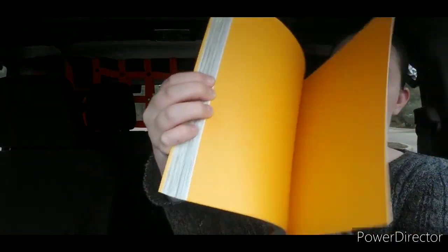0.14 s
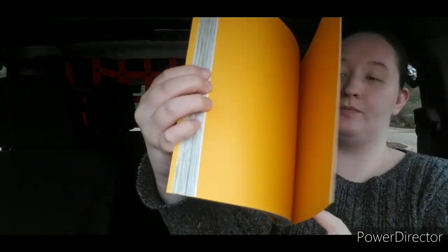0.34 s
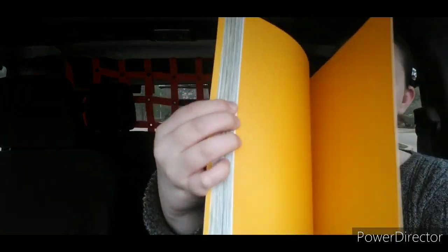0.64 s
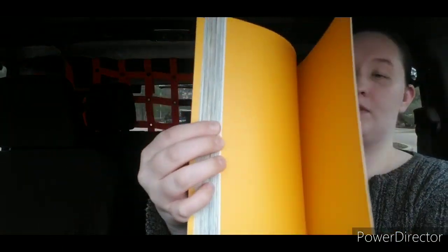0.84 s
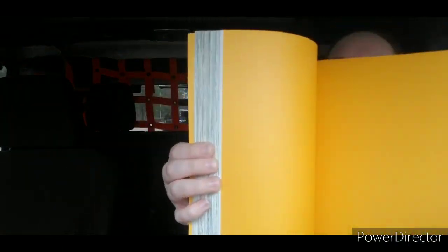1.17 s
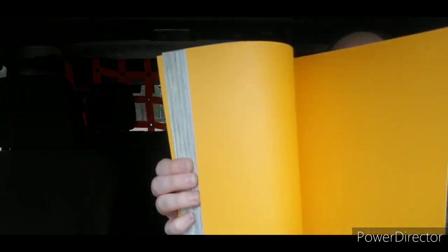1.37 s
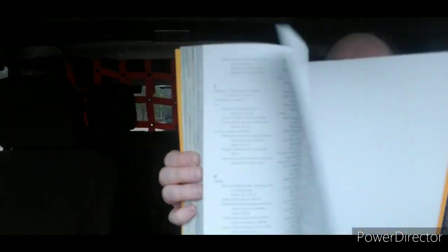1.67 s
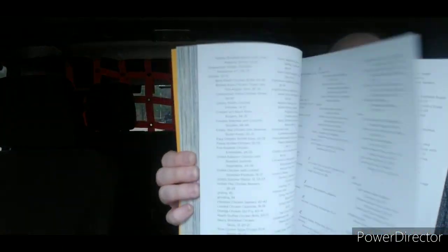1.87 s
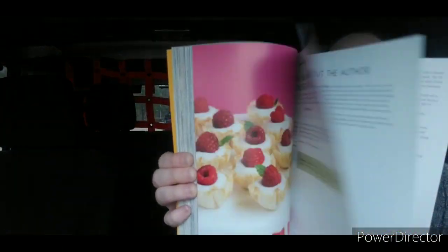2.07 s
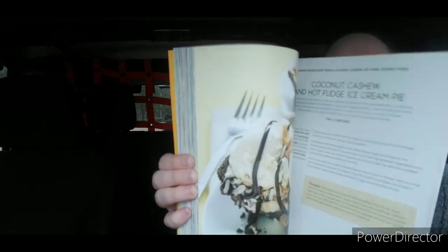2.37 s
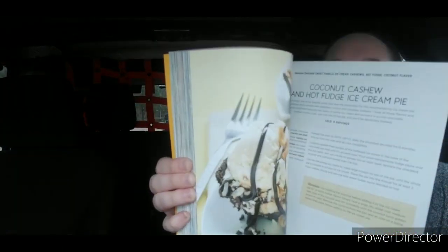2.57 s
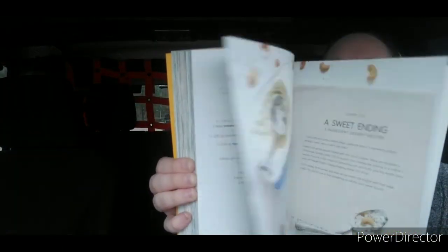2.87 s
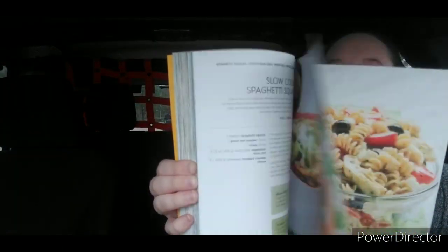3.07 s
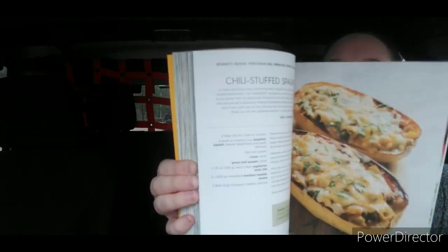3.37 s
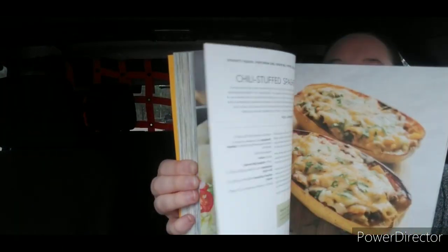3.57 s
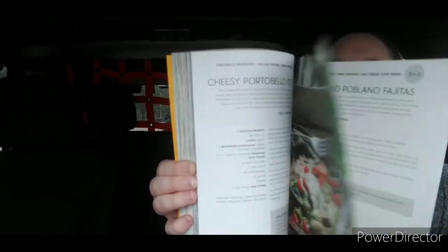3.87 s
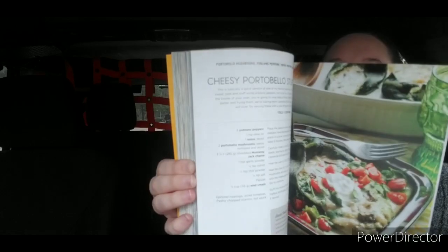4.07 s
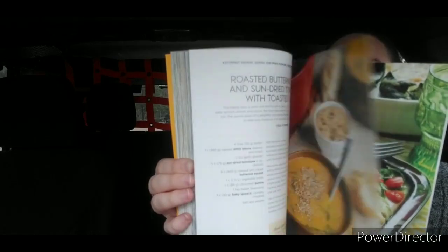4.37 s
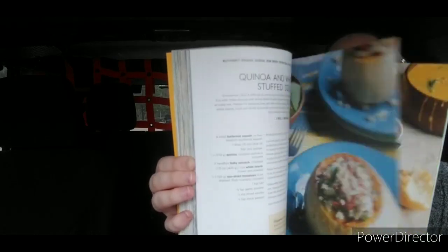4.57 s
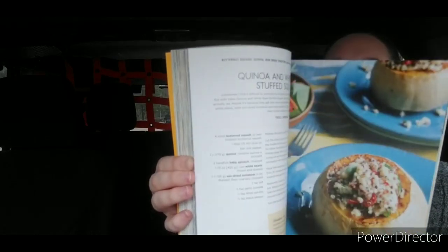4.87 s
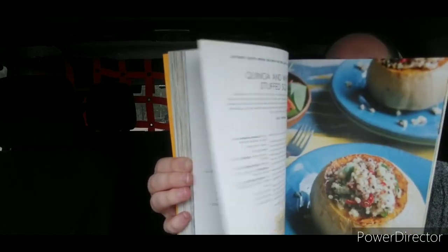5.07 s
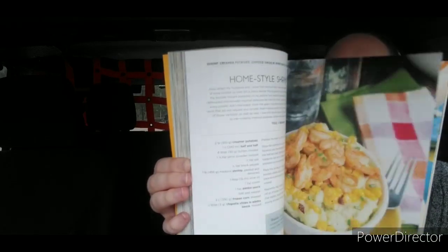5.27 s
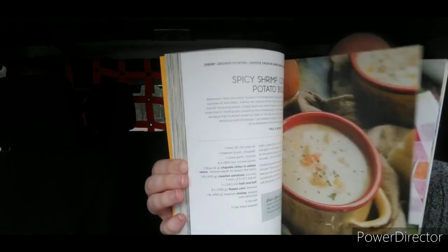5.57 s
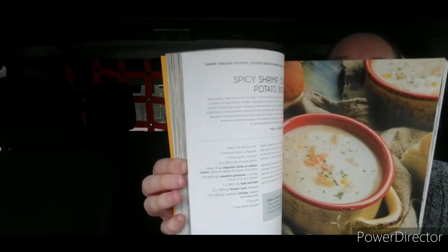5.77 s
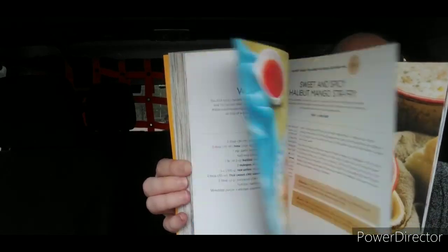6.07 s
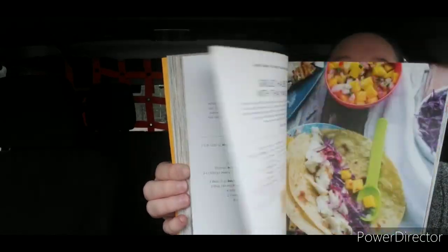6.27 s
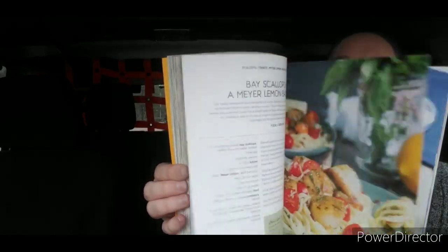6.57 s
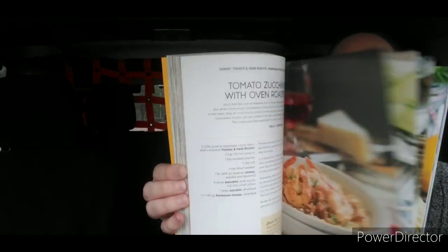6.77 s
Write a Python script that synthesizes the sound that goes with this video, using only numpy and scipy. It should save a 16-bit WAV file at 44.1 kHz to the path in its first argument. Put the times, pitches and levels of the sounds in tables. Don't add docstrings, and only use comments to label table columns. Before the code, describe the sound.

Glossy paperback pages snap and swish past a thumb one by one, after a creaking spine, over a low idling engine hum.

```python
import sys
import numpy as np
from scipy import signal
from scipy.fft import rfft, irfft
from scipy.io import wavfile
from scipy.ndimage import uniform_filter1d, map_coordinates

SR = 44100
rng = np.random.default_rng(int(sys.argv[2]) if len(sys.argv) > 2 else 0)


def boost(x):
    u = np.asarray(x, float) / 20
    return 10 ** u


def transcribe(signal):
    frames = np.atleast_2d(signal).T
    limited = np.clip(frames, -1, 1)
    pcm = np.round(limited * 32767).astype(np.int16)
    wavfile.write(sys.argv[1], SR, pcm)


N = 305613


def rms_one(x):
    return x / np.sqrt(np.mean(x ** 2) + 1e-20)


def in_time(rows, outside=None):
    s, *columns = np.transpose(rows)
    return [np.interp(np.arange(N) / SR, s, column, outside, outside) for column in columns]


def at_hz(points, hz):
    point_hz, value = np.transpose(points)
    return np.interp(np.log(hz + 1), np.log(point_hz), value)


def drift(rate_hz):
    knots = rng.standard_normal(400)
    return map_coordinates(knots, [np.arange(N) / SR * rate_hz], order=3, mode="wrap")


def panned(db):
    return boost(np.array([db / 2, -db / 2]))


def resonance(x, hz, width_hz):
    r = np.exp(-np.pi * width_hz / SR)
    top = np.array([1, 0, -1]) * (1 - r * r) / 2
    bottom = [1, -2 * r * np.cos(2 * np.pi * hz / SR), r * r]
    return signal.lfilter(top, bottom, x + 1e-18)


def coloured(x, modes):
    click = signal.unit_impulse(2048)
    ring = 0
    for k, (hz, width_hz, db) in enumerate(modes):
        once = resonance(click, hz, 0.89 * width_hz)
        ring = ring + (-1) ** k * boost(db) * resonance(once, hz, width_hz)
    return signal.oaconvolve(x, ring[None] / np.linalg.norm(ring))[:, :N]


def crackle(per_s, spread_db, smooth):
    sizes = boost(spread_db * np.minimum(rng.exponential(1, N), 4)) * rng.choice([-1, 1], N)
    slips = sizes * (rng.random(N) < per_s / SR)
    return rms_one(rms_one(slips) + smooth * rng.standard_normal(N))


# pitch_hz, likeness (1 same, 0 or below unlike)
LIKENESS = [(60, 0.97), (180, 0.89), (550, 0.38), (1650, -0.7), (4970, -0.13), (15000, -0.017)]
# pitch_hz, left_minus_right_db
NOISE_LEAN = [(60, 5), (380, 3.5), (2380, 3.5), (15000, -1.5)]


def stereo_noise(spectrum):
    hz = np.arange(N // 2 + 1) * SR / N
    mid, side = rfft(rng.standard_normal((2, N)))
    alike = np.clip(at_hz(LIKENESS, hz), 0, 1)
    pair = np.sqrt(1 + alike) * mid + np.sqrt(1 - alike) * side * [[1], [-1]]
    out = irfft(pair * boost(at_hz(spectrum, hz)) * panned(at_hz(NOISE_LEAN, hz)), N)
    return out / np.std(out.mean(axis=0))


# pitch_hz, level_db (per Hz)
HISS = [(760, -46), (1300, -3.5), (1900, -2), (3100, -4.5), (4300, -6), (5700, -10), (6800, -5),
        (8000, -6.5), (8600, -10.5), (9500, -0.5), (11200, -3.5), (12800, 2), (15600, -4), (17000, -2.5)]


def microphone_hiss():
    return boost(-67 + 0.22 * drift(3.2)) * stereo_noise(HISS)


# pitch_hz, level_db (per Hz)
RUMBLE = [(12, -15.5), (22, -2.5), (45, -0.5), (80, -2.5), (130, -5.5), (165, -9.5), (250, -11.5),
          (420, -13), (620, -18), (820, -24), (1100, -31.5), (1400, -46), (2200, -52), (4000, -64)]


def cabin_rumble():
    return boost(-47.5) * stereo_noise(RUMBLE)


# pitch_hz, width_hz, level_db
HUMS = [(120.6, 9.6, -59), (199.5, 9.2, -58.5), (285.3, 26, -62.5), (395, 34, -63.5), (606, 10.6, -69.5),
        (1013, 34, -82.5)]


def hums():
    out = 0
    for hz, width_hz, db in HUMS:
        shaking = rng.standard_normal((1, N)) + 0.18 * rng.standard_normal((2, N))
        ringing = resonance(resonance(shaking, hz, width_hz), hz, width_hz)
        out = out + boost(db) * rms_one(ringing)
    return out * panned(1.7)[:, None]


def tone(hz, db, lag):
    turns = np.cumsum(hz) / SR
    return np.sqrt(2) * boost(db) * np.sin(2 * np.pi * turns + np.array([[-lag], [0]]) + 0.54)


# time_s, pitch_hz, level_db
FAR_LOW = [(1.5, 103.6, -59), (2.902, 107.9, -54.5), (3.58, 109.6, -44.5), (3.85, 110.6, -53),
           (4.15, 111.6, -43.5), (4.45, 114.6, -70), (4.8, 115.5, -54.5), (5.299, 118.9, -51),
           (5.949, 121.2, -58)]
# time_s, pitch_hz, level_db
FAR_HIGH = [(3.798, 228.1, -97), (4.0, 227, -62.5), (4.35, 227.7, -53.5), (4.65, 228, -61),
            (4.95, 228.4, -60), (5.2, 229.3, -62.5), (5.45, 229.4, -51), (5.9, 229.8, -63.5),
            (6.9, 230.4, -61.5)]


def far_vehicle():
    out = 0
    for rows in FAR_LOW, FAR_HIGH:
        hz, db = in_time(rows, outside=-150)
        out = out + tone(hz + 1.0 * drift(5.5), db + 2.5 * drift(7.0), lag=0.45)
    return out * panned(6.2)[:, None]


# time_s, pitch_hz, level_db
IDLE = [
    (0.1, 34.3, -42.5),
    (2.5, 33.65, -42),
    (5, 34.3, -41.5),
    (6.85, 34.1, -41),
]
# thirds, level_db (re firing)
THIRDS = [(2, -14.5), (5, -16), (6, -27), (7.5, -30)]


def engine():
    hz, db = in_time(IDLE)
    out = tone(hz, db + 1.2 * drift(7.2), lag=0.29)
    for thirds, re_db in THIRDS:
        third_hz = hz * thirds / 3 + 0.5 * drift(2.12)
        out += tone(third_hz, db + re_db + 7.7 * np.tanh(drift(2.03)), lag=0.05)
    return out * panned(5.1)[:, None]


# pitch_hz, width_hz, level_db
SPINE = [
    (1004, 260, 0),
    (1016, 250, -1.2),
    (1696, 166, 0.013),
]
# start_s, peak_db, high_creak_share (0-1)
CREAKS = [(0.212, -37, 0), (0.275, -37, 0.3), (0.307, -32, 0.84), (0.3113, -37, 0.9), (0.317, -35, 1),
          (0.3223, -29, 0.8), (0.327, -29.5, 0.8), (0.331, -33, 0.8), (0.336, -33, 0.45), (0.34, -40, 0.8),
          (0.344, -37, 0.3), (0.349, -37, 0.3), (0.353, -42, 0.2), (0.614, -40, 0.36),
          (0.6453, -34.5, 0.44), (0.65, -33, 0), (0.748, -43, 0), (0.652, -48, 0.6), (0.912, -41, 0.54),
          (1.018, -44, 0.05), (1.027, -56, 0.1), (1.044, -43, 0.05), (1.067, -55, 0.1), (1.096, -56, 0.05),
          (1.103, -45, 0), (1.112, -50, 0.1), (1.164, -33.5, 0.57), (1.186, -47, 0), (1.194, -53, 0.1),
          (1.2, -53, 0.4), (1.216, -42.5, 0.9), (1.44, -37, 0.25), (2.037, -49, 1), (3.027, -43, 0.66),
          (6.0208, -47, 0.2), (6.037, -46, 1), (6.053, -50, 1), (6.439, -40, 0.85), (6.697, -33.5, 0.85)]
# start_s, peak_db, pitch_hz
KNOCKS = [(0.2125, -37.5, 1330), (0.647, -35, 2250), (0.6525, -37, 2000), (0.648, -43, 890),
          (0.654, -46, 860), (1.02, -52, 850), (1.045, -47, 850), (1.217, -49, 1150), (1.165, -39.5, 825),
          (1.189, -39, 834), (1.197, -42, 760), (1.203, -64, 780), (6.0215, -41.5, 1390),
          (6.028, -51, 1055)]


def creaks():
    s, db, upper = np.transpose(CREAKS)
    upper = np.clip(upper, 0, 1)
    out = np.zeros(N)
    for (hz, width_hz, level_db), share in zip(SPINE[1:], [1 - upper, upper]):
        clicks = np.zeros(N)
        clicks[(s * SR).astype(int)] = boost(db + 32.5 + level_db) * share
        out += resonance(resonance(clicks, hz, 850), hz, width_hz)
    for start_s, peak_db, hz in KNOCKS:
        i = int(start_s * SR)
        soft = resonance(signal.unit_impulse(1024), hz, 620)
        out[i:i + 1024] += boost(peak_db + 31.5) * resonance(soft, hz, 410)
    return out * panned(4.1)[:, None]


def strokes(rows):
    t, out = np.arange(N) / SR, np.zeros((2, N))
    for s, length, db, second_db in rows:
        near = slice(max(0, int((s - .3) * SR)), int((s + length + .3) * SR))
        u = t[near] - s
        rise_s, fall_s = 0.014 + 0.44 * length, 0.0065 + 0.06 * length
        shape = 4.5 * (np.sin(np.pi * np.clip(u / length, 0, 1)) - .5)
        shape += 20 * np.minimum(u, 0) / rise_s
        shape -= 20 * np.maximum(u - length, 0) / fall_s
        out[:, near] += boost(db + shape + np.array([[0], [second_db]]))
    return out


# start_s, length_s, treble_db, middle_db (re treble)
GLIDES = [(.03, 0.056, -52.5, -8.5), (.135, 0.089, -35, -10.5), (.262, 0.034, -59, -9),
          (.31, 0.049, -50.5, -2.5), (.365, 0.12, -55, -12.5), (.565, 0.044, -52.5, -10),
          (.59, 0.037, -42.5, -9.5), (.642, 0.013, -39.5, -7), (.66, 0.02, -50, -7),
          (.675, 0.064, -36.5, -14), (.79, 0.018, -54, -8.5), (.85, 0.05, -58.5, -4.5),
          (.91, 0.035, -52.5, -8), (1.01, 0.053, -60.5, -1.5), (1.09, 0.044, -58.5, -6),
          (1.15, 0.08, -60, -6.5), (1.25, 0.78, -68, -5), (2.196, 0.0098, -66, -21),
          (2.216, 0.014, -51.5, -4), (3.0, 0.016, -63, -7), (5.406, 0.006, -53, -14),
          (5.415, 0.018, -38.5, -12), (6.024, 0.011, -50, -13), (6.262, 0.017, -45.5, -4),
          (6.418, 0.0073, -48, -6), (6.432, 0.015, -42, -14), (6.592, 0.022, -57, -11),
          (6.619, 0.011, -45, -18), (6.659, 0.018, -46, -9), (6.694, 0.012, -41, -4),
          (6.835, 0.094, -65, -6)]
# start_s, length_s, sheet_db, spine_db (re sheet)
GRINDS = [(.025, 0.035, -65.5, 8.5), (.06, 0.19, -60.5, -10), (.212, 0.019, -45, -3), (.265, 0.03, -53, -1),
          (.308, 0.042, -41.5, -5.5), (.385, .05, -55.5, -6), (.59, 0.068, -50.5, -1.5),
          (.642, 0.015, -50, 0), (.668, 0.077, -57.5, -6), (.738, 0.02, -51, 2.5), (.765, 0.015, -57, 3),
          (.85, 0.025, -58, -4), (.905, 0.044, -59.5, 6.5), (1.012, 0.025, -59.5, 15),
          (1.05, 0.023, -54, 2), (1.093, 0.026, -66, 19), (1.122, 0.034, -62, 12), (1.185, 0.022, -56.5, 6),
          (1.28, 0.26, -69.5, 5), (5.428, 0.006, -48, -17), (6.035, 0.061, -61.5, -3),
          (6.262, 0.047, -60, -3), (6.67, 0.037, -46, -24), (6.696, 0.008, -56, -19)]


def slides():
    levels = np.vstack([strokes(GLIDES), strokes(GRINDS)])
    # slips_per_s, size_spread_db, smooth_part, unlike_part, lumps_db, lean_db
    kinds = [(8950, 3.0, 1.1, 1.0, 1.4, 6.0), (3500, 3.9, 0.6, 1.0, 1.3, 9.1),
             (895, 1.2, 1.5, 0.68, 2.7, 3.6), (515, 4.7, 0.66, 0.17, 2.5, 4.0)]
    out = []
    for level, (per_s, spread_db, smooth, unlike, lumps_db, lean_db) in zip(levels, kinds):
        shared = crackle(per_s, spread_db, smooth)
        own = crackle(per_s, spread_db, smooth)
        friction = rms_one(shared + unlike * own * [[1], [-1]])
        lumps = boost(lumps_db * drift(50) - 9.0)
        out.append(lumps * level * friction * panned(lean_db)[:, None])
    return out


# start_s, treble_db,
# edge_db (re treble), flap_db (re treble)
PAGES = [(0.6395, -41, -8, -5), (1.4468, -36, -14, -13.5), (1.614, -39.5, -10.5, -15),
         (1.75, -50.5, -4, -2.5), (1.7697, -43, -1.5, 0), (1.9612, -38.5, -9, -12),
         (2.0362, -42, -7.5, -3.5), (2.2128, -36, -6, -23), (2.2285, -46, -2.5, 0), (2.696, -40, -2.5, -10),
         (2.866, -43, -1.5, -10), (3.0225, -38, -4.5, -2.5), (3.1782, -43.5, -5.5, -5),
         (3.7858, -47.5, -4.5, -8), (4.2635, -40, -11.5, 1), (4.4705, -39.5, -1, 1),
         (4.8691, -39, -4.5, -16), (4.9081, -43.5, -8.5, -6), (5.0956, -41.5, -5.5, -2.5),
         (5.4039, -45, 1.5, 0), (5.4147, -44.5, -10, 6), (5.431, -41, -6, 2), (6.021, -47.5, -1, 0),
         (6.0398, -34.5, -8.5, -15), (6.2679, -34, -6.5, -17), (6.4147, -28, -16, -32),
         (6.4292, -43, -1, -1.5), (6.6156, -30.5, -13.5, -17), (6.6712, -36, -8, -5),
         (6.7001, -41, -7.5, 0.5),
         (0.2117, -39.5, -1, -3), (0.6451, -35, -5.5, -20), (0.6543, -39.5, -2, -24),
         (0.699, -48, 2.5, -19), (4.405, -54, -11, -9), (4.415, -50.5, -14, -7), (4.425, -55, -23, -1),
         (4.437, -50, -15, -7), (4.448, -50, -14, -6), (4.4611, -42, -10, 2), (6.598, -64, -3, -11),
         (6.648, -67, -14, 0), (6.664, -33.5, -11, -6.5), (6.677, -54, -13, -6), (6.7055, -54, -14, -20),
         (1.164, -54.5, 0.5, 7), (3.5112, -52.5, -9, -35), (3.547, -55.5, -9, -26), (3.591, -67.5, 0, 3),
         (3.7948, -49, -16, -3.5), (4.0138, -47.5, -13, -7), (4.1319, -49.5, -8, -7),
         (4.269, -50, -12.5, -14), (4.494, -42, -16, -13), (4.636, -61.5, 1.5, -10),
         (4.744, -51.5, -5, -24), (5.088, -46, -6, 4), (5.236, -45, -18, -23), (5.3257, -50.5, -10.5, -27),
         (5.3433, -55, -12, -16), (5.3603, -51.5, -14, -11), (5.7473, -69, 0, -16),
         (5.8044, -60.5, -9, -26), (5.85, -62, -7, -19), (6.051, -47.5, -4, -0.5), (6.2625, -39, -4, -25),
         (6.2773, -41.5, -6, -3), (6.4388, -42, -9, -4.5), (6.6252, -35.5, -9, -1.5),
         (6.8374, -47.5, -18, -16), (6.8667, -48, -11, -10), (6.893, -47, -11, -6)]
# start_s, treble_db, flap_db (re treble)
CATCHES = [(1.4405, -66, 13), (1.605, -54, -3), (1.7623, -54, -3), (1.9555, -48.5, -1), (1.961, -55, -15),
           (2.03, -57, 0), (2.205, -56, -18), (2.67, -48.5, -28), (2.849, -51, -19), (2.8558, -56, -13),
           (4.2248, -51, -3), (4.234, -53, -9), (6.234, -48, -18), (6.254, -50, -19), (6.4057, -57, -8),
           (6.59, -55, -7), (6.605, -56, -6), (5.3888, -61, -13), (2.655, -64, -17), (6.441, -48, 2)]
# start_s, end_s, first_db, last_db
RIFFLES = [
    (5.045, 5.072, -54.5, -49),
]
# time_s, corner_db (re treble)
CORNERS = [(0.6395, -13), (0.6455, -6), (1.165, -8), (1.4478, -10), (1.614, -1), (1.75, -2), (1.7702, -7),
           (1.9618, -4), (2.0362, 0), (2.2128, -4), (2.67, -6), (2.696, -0.5), (2.8664, -5), (3.023, -9),
           (3.1782, -2), (3.7858, -7), (4.2246, -1), (4.449, 2), (4.8691, -4), (5.4039, -10), (5.4147, 2),
           (5.431, -7), (6.236, -13), (6.255, -2), (6.2625, -4), (6.4388, -13), (6.6156, -16),
           (6.6244, -20), (6.6712, -13), (6.7001, -5)]
CORNER_DB = -8.5


def snap_rows():
    rows = PAGES + [(s, db, -10.5, flap_db) for s, db, flap_db in CATCHES]
    for start_s, end_s, first_db, last_db in RIFFLES:
        count = round((end_s - start_s) / 0.012) + 1
        for k in np.linspace(0, 1, count):
            rows.append((start_s + k * (end_s - start_s), first_db + k * (last_db - first_db), -12, -5))
    s, db, edge_db, flap_db = np.transpose(rows)
    lean_db = 2.5 - 0.26 * (db + 34.0) - 0.5 * rng.standard_normal(len(s))
    sheet_db = -14.5 + 0.26 * flap_db
    corner_db = np.full(len(s), CORNER_DB)
    for when, re_db in CORNERS:
        corner_db[np.argmin(np.abs(s - when))] = re_db
    return np.transpose([s, db, edge_db, flap_db, sheet_db, corner_db, lean_db])


# level_db (treble, edge, flap, sheet, corner)
CLICK_DB = [-2.5, -0.5, -9, -13.5, 2]


def snaps():
    rows = snap_rows()
    drive = np.zeros((5, 2, N + 1024))
    t = (np.arange(1000) - 100) / SR
    grit = crackle(3000, 4.3, 0.85)
    lags = rng.integers(0, 5, (len(rows), 2))
    shape = np.where(t < 0, 1.54 * np.exp(t / 0.00032), np.exp(-(np.maximum(t, 0) / 0.0013) ** 0.45))
    for (s, db, edge_db, flap_db, sheet_db, corner_db, lean_db), lag in zip(rows, lags):
        i = round(s * SR) - 100
        burst = shape * grit[i - 1000:i]
        burst *= 9.67 / np.linalg.norm(burst)
        click_db = 0.13 * (db + 39.0) + np.array(CLICK_DB)
        click = 8.75 * boost(click_db)[:, None] * (t == 0)
        parts_db = np.array([-2.5, edge_db + 0.17, flap_db - 6.0, sheet_db - 3.0, corner_db - 2.5])
        sound = boost(db + parts_db)[:, None] * (burst + click)
        for port in 0, 1:
            begin = i + lag[port]
            drive[:, port, begin:begin + 1000] += panned(lean_db)[port] * sound
    return drive[:, :, :N]


# pitch_hz, width_hz, level_db
TREBLE = [
    (9960, 2520, 17),
    (13090, 2500, 20.5),
    (15600, 4500, -8),
    (17500, 2400, -19),
]
# pitch_hz, width_hz, level_db
EDGE = [(4990, 1040, -2.5), (6700, 1860, 0), (8700, 14000, -14.5)]
# pitch_hz, width_hz, level_db
FLAP = [(2755, 1050, -1.5), (3450, 1000, 3), (4270, 1830, -3.5)]
# pitch_hz, width_hz, level_db
SHEET = [(1640, 890, -3), (1760, 330, 3.5), (2354, 790, -5.5)]


def book_parts():
    treble, middle, sheet, spine = slides()
    rubbed = treble, boost(0.5) * middle, boost(-4.5) * middle, sheet, boost(CORNER_DB) * treble
    modes = TREBLE[1:], EDGE, FLAP, SHEET, TREBLE[:1]
    parts = [coloured(snap + rub, mode) for snap, rub, mode in zip(snaps(), rubbed, modes)]
    corner = parts.pop()
    parts[0] -= corner
    parts.append(coloured(spine, SPINE[:1]) + creaks())
    return parts


# left_ms, right_ms, level_db
ECHOES = [
    (.9, 0.3, -21.5),
    (3.0, 3.1, -22),
    (4.6, 8.1, -42),
]


def cabin(x, cabin_t60_s):
    t = np.arange(SR // 3) / SR
    grow = np.clip(t / 0.00094, 0, 1)
    response = 0
    for t60_s, db in (cabin_t60_s, -1), (0.42, -16):
        tail = grow * boost(-60 * t / t60_s)
        response = response + boost(db) * tail / np.linalg.norm(tail) * rng.standard_normal((2, len(t)))
    response[:, 0] = 1
    for k, (left_ms, right_ms, db) in enumerate(ECHOES):
        delays = [round(left_ms * SR / 1000), round(right_ms * SR / 1000)]
        response[[0, 1], delays] += boost(db) * (-1) ** k
    return signal.oaconvolve(x, response, axes=1)[:, :N]


# fade_by_60_db_s (treble, edge, flap, sheet, spine)
CABIN_T60_S = [0.025, 0.031, 0.098, 0.055, 0.028]
# pitch_hz, left_minus_right_db
BOOK_LEAN = [(1000, 0.5), (2000, -0.7), (4000, 0), (7500, 1), (10000, -4.5), (13000, 1)]


def book():
    near = sum(map(cabin, book_parts(), CABIN_T60_S))
    hz = np.arange(N // 2 + 1) * SR / N
    return irfft(rfft(near) * panned(at_hz(BOOK_LEAN, hz)), N)


def scene():
    background = microphone_hiss() + cabin_rumble() + hums() + far_vehicle() + engine()
    return background + book()


def drop_faint_bands(x):
    hz, _, cells = signal.stft(x, SR, nperseg=2048, boundary="even")
    power = np.abs(cells.mean(axis=0)) ** 2
    smooth = uniform_filter1d(uniform_filter1d(power, size=10, axis=0), size=3, axis=1)
    level = np.log(smooth + 1e-20)
    level -= .6 * uniform_filter1d(level, size=48, axis=0)
    level -= .85 * np.median(level, axis=1, keepdims=True)
    inside = (hz > 1300) & (hz < 9000)
    gone = inside[:, None] & (level < np.quantile(level[inside], .09))
    return signal.istft(cells * ~gone, SR, nperseg=2048)[1][:, :N]


def low_pass(x):
    return signal.sosfilt(signal.butter(12, 16830, fs=SR, output="sos"), x)


def record(dry):
    top_hz, cutoff_hz = 15550, 16650
    both_ways = np.hstack([dry, dry[:, ::-1]])
    hz, spectrum = np.arange(N + 1) * SR / (2 * N), rfft(both_ways)
    main = irfft(spectrum * (hz <= top_hz))[:, :N]
    slope = np.clip((cutoff_hz - hz) / 400, 0, 1)
    top = irfft(spectrum * (hz > top_hz) * slope)[:, :N]
    power = uniform_filter1d((np.diff(both_ways, 2)[:, :N] ** 2).sum(axis=0), size=64)
    before = np.roll(uniform_filter1d(power, size=600), 400)
    attack = power > boost(28) * before
    around = uniform_filter1d(1. * attack, size=200) > 1e-6
    gate = uniform_filter1d(1. * around, size=200)
    return low_pass(drop_faint_bands(main) + gate * top)


dry = scene()
out = record(dry)
transcribe(out)
```